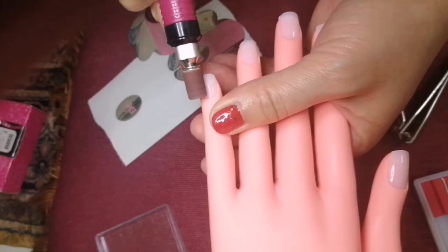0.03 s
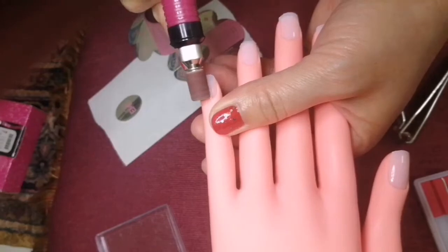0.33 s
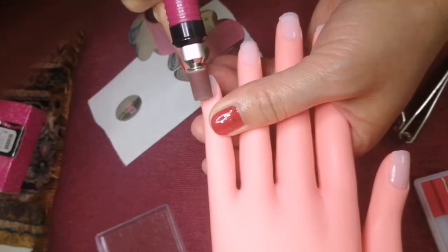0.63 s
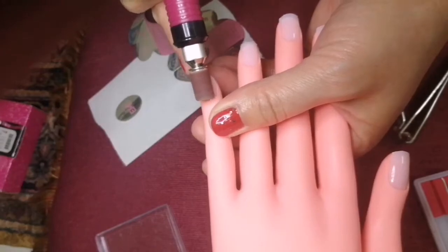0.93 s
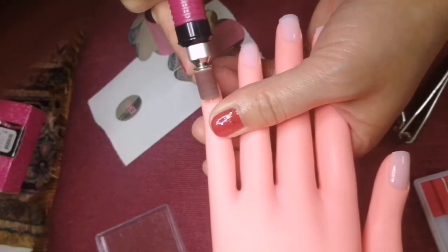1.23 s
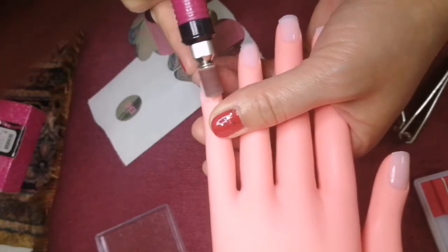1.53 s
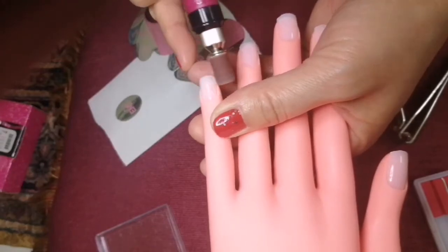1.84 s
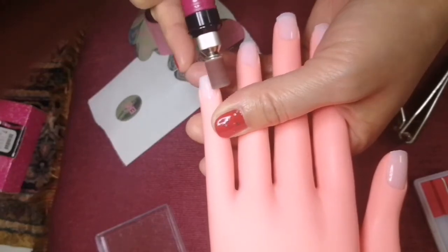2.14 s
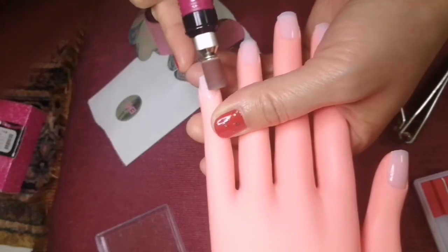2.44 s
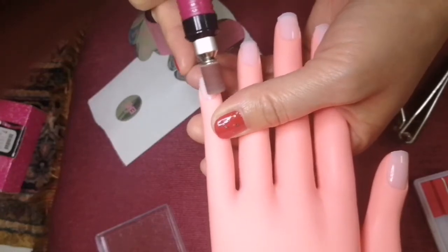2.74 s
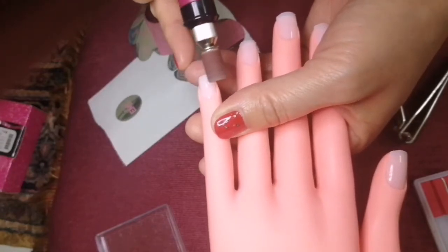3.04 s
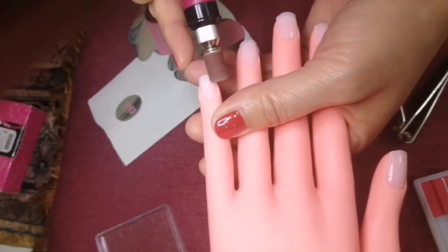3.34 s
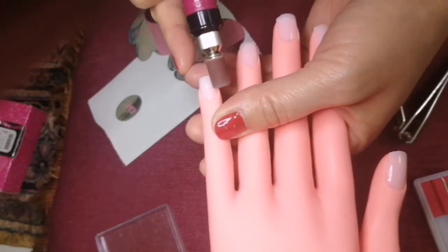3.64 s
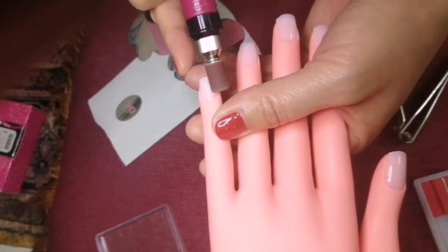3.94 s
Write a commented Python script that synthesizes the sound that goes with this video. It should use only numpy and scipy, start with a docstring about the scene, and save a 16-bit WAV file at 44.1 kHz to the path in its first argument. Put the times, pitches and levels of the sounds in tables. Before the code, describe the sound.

An electric nail drill hums close by in a small room. Its sanding drum rasps against a plastic nail in about nine short strokes, each with a fluttering buzz and thin high ring as the motor slows slightly.

```python
"""Electric nail drill on a plastic nail

A drill hums at about 65 turns a second, close by in a small room. Its sanding drum is pressed on the
nail in nine short strokes and slows under the load. The drum runs slightly out of true, so once a
turn it thumps the nail and bites harder: the grit rasps and the bit sings near 7 kHz."""
import sys
import numpy as np
from scipy import signal
from scipy.fft import rfft, irfft
from scipy.io import wavfile
from scipy.ndimage import map_coordinates

SR = 44100
rng = np.random.default_rng(int(sys.argv[2]) if len(sys.argv) > 2 else 0)


def generate_wav(sig):
    """Save sig (samples, or channels by samples) to the path in sys.argv[1] as 16-bit PCM at SR."""
    pcm = np.round(np.clip(np.atleast_2d(sig).T, -1, 1) * 32767).astype(np.int16)
    wavfile.write(sys.argv[1], SR, pcm)


N = 176400
TIME_S = np.arange(N) / SR
KNOCK_TURN, SHOVE_TURN, BITE_TURN = .04, .08, .15  # places within one turn


def from_db(db):
    """Decibels to amplitude ratio."""
    return 10 ** (np.asarray(db) / 20)


def unit_power(x):
    """Normalisation to a mean square of one."""
    return x / np.sqrt(np.mean(x ** 2) + 1e-20)


def in_time(rows):
    """Linear interpolation of each column over time."""
    time_s, *columns = np.transpose(rows)
    return [np.interp(TIME_S, time_s, column) for column in columns]


def at_hz(points):
    """Interpolation over log frequency."""
    hz, value = np.transpose(points)
    return np.interp(np.log(np.fft.rfftfreq(2 * N, 1 / SR) + 1), np.log(hz), value)


def resonate(x, spectrum):
    """Forced vibration: a body acts as a minimum-phase filter; the output has unit power."""
    cepstrum = irfft(np.log(from_db(at_hz(spectrum))))
    cepstrum[1:N] *= 2
    cepstrum[N + 1:] = 0
    response = np.exp(rfft(cepstrum))
    return unit_power(irfft(rfft(x, 2 * N) * response)[..., :N])


def contact(turns, width, floor, uneven_db):
    """Amplitude modulation: pressure peaks once a turn, unevenly, above a steady floor."""
    phase = turns - BITE_TURN + .5
    strength = from_db(uneven_db * rng.standard_normal(SR))[phase.astype(int) + 1]
    return floor + strength * np.exp(-.5 * ((phase % 1 - .5) / width) ** 2)


def friction(turns, fresh, grain_db):
    """Roughness noise: tiny impacts, partly repeating each turn, partly fresh; two unrelated rows."""
    size = int(N / turns[-1])
    phasors = np.exp(2j * np.pi * rng.random((2, size)))
    rim = unit_power(np.fft.ifft(phasors).real)
    repeated = np.array([map_coordinates(row, [turns % 1 * size], mode="grid-wrap") for row in rim])
    noise = rng.standard_normal((2, N))
    grains = unit_power(noise * from_db(grain_db * np.minimum(rng.exponential(1, N), 5)))
    return np.sqrt(1 - fresh) * repeated + np.sqrt(fresh) * grains


def knocks(turns, at, scatter_rad, jitter_turns):
    """Periodic impacts: one knock a turn is a harmonic series, smeared by phase scatter."""
    half_turns = np.arange(2 * int(turns[-1]) + 4)
    wander = np.interp(2 * turns, half_turns, rng.standard_normal(len(half_turns)))
    phase = turns - at + jitter_turns * wander
    harmonics, grid = np.arange(2, 60), np.linspace(0, 1, 2048)
    offsets = scatter_rad * rng.standard_normal(len(harmonics))
    cycle = np.cos(2 * np.pi * np.outer(grid, harmonics) + offsets).sum(axis=1)
    return unit_power(np.interp(phase % 1, grid, cycle))


def reverberation(x, t60_s=.16, above_hz=1340):
    """Diffuse reflections: a treble tail that decays exponentially."""
    t = np.arange(SR // 2) / SR
    tail = rng.standard_normal((2, len(t))) * np.exp(-np.log(1000) * t / t60_s)
    highpass = signal.butter(2, above_hz, "high", fs=SR, output="sos")
    tail = signal.sosfilt(highpass, unit_power(tail) / np.sqrt(len(t)))
    return signal.fftconvolve(x, tail, axes=1)[:, :N]


# Level difference: frequency_hz, left_minus_right_db
BALANCE = [(300,0.9),(900,1),(1500,-2),(2000,0),(2300,4.8),(2800,-1),(4500,-1),(5200,-6),(5900,-14),(6600,-13),(7350,-9),(7700,1),(8900,3),(9300,15),(10100,20),(11000,11.8),(12000,10.7),(14000,1.7),(16000,0)]
# Phase difference: frequency_hz, left_lead_rad
PHASE_LEAD = [(100,0),(800,0),(1300,1.3),(1900,2.7),(2600,2.4),(3000,3.6),(3700,3.8),(4100,1.6),(4900,.3),(5400,-.9),(7200,-.7),(8000,0),(16000,0)]
# Likeness of the channels: frequency_hz, coherence_ratio
COHERENCE = [(40,0.79),(150,0.33),(800,0.75),(1400,0.53),(2500,0.59),(3200,0.22),(4800,1),(6200,0.24),(7200,0.96),(8400,0.66),(10000,.3),(14000,0.22)]

def microphones(x):
    """Partial coherence: row 0 reaches two ports in phase, row 1 opposed; each has its gain and lag."""
    shared, opposed = rfft(x, 2 * N)
    alike, sides = np.clip(at_hz(COHERENCE), 0, 1), np.array([[1], [-1]])
    pair = np.sqrt((1 + alike) / 2) * shared + sides * np.sqrt((1 - alike) / 2) * opposed
    gain = from_db(sides * at_hz(BALANCE) / 2)
    gain /= np.sqrt(np.mean(gain ** 2, axis=0))
    lead = np.exp(.5j * sides * at_hz(PHASE_LEAD))
    return irfft(gain * lead * pair)[:, :N]


# Room noise spectrum: frequency_hz, gain_db
RUMBLE_SPECTRUM = [(20,-3.5),(30,-8.5),(40,5.5),(50,-7),(80,-9),(120,-9.5),(170,-16.5),(400,-18),(1500,-70),(15000,-35.5)]

def room_rumble(level_db=-67):
    """Ambient noise: steady, with its power mostly in the bass."""
    return from_db(level_db) * resonate(rng.standard_normal((2, N)), RUMBLE_SPECTRUM)


# Low drone: time_s, level_db
DRONE_LEVEL = [(0.1,-88),(0.5,-84),(0.65,-67),(0.82,-69),(1.0,-70.5),(1.6,-66.5),(1.8,-91),(4,-79)]

def drone(turns):
    """Second harmonic: a pure tone at twice the rotation rate, in the shared row."""
    level_db, = in_time(DRONE_LEVEL)
    return from_db(level_db) * np.sqrt(2) * np.sin(2 * np.pi * 2 * turns) * [[1], [0]]


# The motor is heard more or less directly as the hand turns: time_s, hum_db, hiss_db
MOTOR_LEVELS = [(0.07,-93,-74),(0.16,-50.5,-50),(0.65,-56.5,-55),(1.3,-55,-54.5),(1.9,-56,-53.5),(2.42,-59,-55),(3.1,-59,-53),(4,-66.5,-53)]
# Housing and bearing spectra: frequency_hz, gain_db
HOUSING_SPECTRUM = [(250,-35.5),(400,-36.5),(560,-6),(760,-34),(925,0),(1130,-18.5),(1390,-3),(1750,-9.5),(2100,-13.5),(2550,4.5),(2900,-10.5),(3200,-4),(3700,-25.5),(6000,-9.5)]
BEARING_SPECTRUM = [(700,-22),(2500,-5.5),(3700,-15),(4400,-10),(5100,0.5),(5900,2),(7200,-11),(8300,-8.5),(10000,-4.5),(12500,-13),(15000,-12.5)]

def motor(turns):
    """Structure-borne sound: the rotor knocks and rattles its housing once a turn; the bearings hiss."""
    hum_db, hiss_db = in_time(MOTOR_LEVELS)
    rattle = friction(turns, fresh=.3, grain_db=1) * contact(turns, width=.08, floor=.12, uneven_db=1)
    knock = np.array([knocks(turns, KNOCK_TURN, scatter_rad=.45, jitter_turns=.001),
                      knocks(turns, BITE_TURN, scatter_rad=.6, jitter_turns=.001)])
    hum = resonate(knock + 1.05 * unit_power(rattle), HOUSING_SPECTRUM)
    rolling = friction(turns, fresh=.64, grain_db=3) * contact(turns, width=.12, floor=1.37, uneven_db=1)
    return from_db(hum_db) * hum + from_db(hiss_db) * resonate(rolling, BEARING_SPECTRUM)


# Fizz on the nail's right edge: time_s, level_db
FIZZ_ENVELOPE = [(3.42,-82),(3.48,-49),(3.72,-52.5),(3.78,-82),(3.84,-82),(3.88,-59),(4,-61)]
# Its spectrum: frequency_hz, gain_db
FIZZ_SPECTRUM = [(7000,-24),(9000,-8),(10000,7),(12000,-3),(15000,-22)]

def edge_fizz(turns, pressure):
    """Impulsive friction: spiky grains fizz near 10 kHz."""
    level_db, = in_time(FIZZ_ENVELOPE)
    return from_db(level_db) * resonate(friction(turns, fresh=.53, grain_db=10) * pressure, FIZZ_SPECTRUM)


# The drum catches an edge: centre_s, sigma_s, level_db
EDGE_CATCHES = [(0.2,0.036,-42.5),(0.83,0.032,-44.5),(2.27,0.017,-40.5),(2.584,0.084,-51.5)]
# Scrape spectrum: frequency_hz, gain_db
SCRAPE_SPECTRUM = [(2000,-21.5),(4200,-13),(4900,-1),(5300,1),(5800,2),(6800,-23),(12000,-32)]

def edge_scrape(turns, pressure):
    """Transient friction: each catch is a harsh burst with a Gaussian envelope."""
    envelope = sum(from_db(level_db) * np.exp(-.5 * ((TIME_S - centre_s) / sigma_s) ** 2)
                   for centre_s, sigma_s, level_db in EDGE_CATCHES)
    return envelope * resonate(friction(turns, fresh=.91, grain_db=-.5) * pressure, SCRAPE_SPECTRUM)


# Nail resonances at three contact points: frequency_hz, gain_db
LEFT_SPECTRUM = [(170,-22),(245,-12),(305,-8),(370,-21),(520,-13),(620,-13),(760,-3),(900,1),(1120,-11),(1280,-8),(1500,-14),(1850,-17)]
TIP_SPECTRUM = [(170,-32),(245,-16),(305,-15),(360,-25),(520,-21),(620,-13),(750,1),(920,-5),(1120,-19),(1280,-10),(1500,-20),(1850,-22)]
RIGHT_SPECTRUM = [(170,-26),(245,-13),(305,-14),(360,-23),(520,-14),(620,-9),(750,1),(920,-6),(1120,-20),(1280,-14),(1500,-6),(1850,-24)]

def nail_thump(turns, to_tip_s=1.9, to_right_s=3.2):
    """Eccentric forcing: the drum's high side shoves the nail, which rings differently at each place."""
    rub = friction(turns, fresh=.6, grain_db=2) * contact(turns, width=.1, floor=.25, uneven_db=1.5)
    shove = knocks(turns, SHOVE_TURN, scatter_rad=.6, jitter_turns=.003) * [[1], [0]]
    force = .6 * unit_power(rub) + shove
    place = np.searchsorted([to_tip_s, to_right_s], TIME_S)
    return sum(resonate(force, [(60, -45)] + nail + [(2600, -30.5), (8000, -39)]) * (place == k)
               for k, nail in enumerate((LEFT_SPECTRUM, TIP_SPECTRUM, RIGHT_SPECTRUM)))


# Envelopes before the trims, one list a stroke: time_s, ring_db, thump_db, rasp_db
STROKE_LEVELS = [
    [(0.08, -69.5, -77.5, -65.5), (0.182, -57, -57.5, -50.5), (0.256, -51, -59.5, -49),
     (0.412, -46.5, -53, -47.5), (0.504, -44, -50, -48.5), (0.554, -70, -78, -60), (0.58, -91, -81, -59)],
    [(0.7, -72, -87, -59), (0.732, -54, -68, -53), (0.756, -49.5, -66, -49), (0.85, -44, -52.5, -47.5),
     (0.918, -44, -51.5, -49.5), (0.95, -65, -77, -61), (0.98, -77, -79, -61)],
    [(1.06, -74, -80, -62), (1.106, -49.5, -63, -57), (1.166, -45, -58.5, -52), (1.172, -47, -54.5, -52),
     (1.232, -47, -52, -55), (1.258, -52, -63, -55), (1.32, -81, -75, -68)],
    [(1.34, -71, -86, -65), (1.392, -48.5, -64, -55.5), (1.466, -48.5, -49, -49.5),
     (1.54, -49.5, -53.5, -57), (1.642, -46.5, -46, -48.5), (1.674, -62, -62, -70), (1.7, -78, -67.5, -76)],
    [(2.12, -78, -98, -61.5), (2.146, -66, -61, -59), (2.176, -54.5, -53.5, -56.5), (2.222, -50, -48, -49),
     (2.274, -43.5, -42, -46.5), (2.332, -41.5, -44.5, -48.5), (2.4, -79, -77, -75)],
    [(2.47, -76, -77, -67), (2.494, -51, -57, -59), (2.52, -46, -43.5, -47.5), (2.622, -42.5, -42.5, -41),
     (2.724, -47.5, -52, -56), (2.75, -60, -83, -76), (2.77, -73, -68, -75)],
    [(2.78, -77, -82, -62), (2.806, -53.5, -52, -61.5), (2.876, -49, -45.5, -48),
     (2.912, -42, -43.5, -52.5), (2.938, -47.5, -49, -52), (2.952, -50, -63, -59), (2.99, -70, -71, -67)],
    [(3.41, -75, -73.5, -69), (3.472, -48.5, -47, -57.5), (3.616, -50, -48, -55), (3.684, -45.5, -44, -51),
     (3.738, -53.5, -49.5, -57), (3.77, -67, -69, -65), (3.8, -77, -67, -61)],
    [(3.83, -82, -68, -73), (3.842, -72, -84, -57), (3.85, -64, -72, -73), (3.854, -52.5, -56.5, -59),
     (3.886, -51, -46.5, -60), (3.916, -52.5, -53, -58.5), (4.0, -51.5, -45.5, -52.5)],
]
# Grit and bit spectra: frequency_hz, gain_db
GRIT_SPECTRUM = [(300,-25),(1000,-3),(1900,-3.5),(2500,4.5),(3000,-4),(3800,-3.5),(4500,-6),(5200,-0.5),(6000,-1),(7500,-27),(9000,-26),(13000,-17.5),(15500,-44)]
BIT_SPECTRUM = [(1500,-27),(4000,-22),(5500,-19.5),(6600,-6),(6900,-4.5),(7150,5),(7450,-7),(7800,-10),(8900,-16.5),(9400,-17.5),(9850,-4.5),(10600,-16.5),(12000,-20),(13500,-27.5),(15200,-25.5)]

def sanding(turns, ring_trim_db=5, thump_trim_db=-2, rasp_trim_db=3):
    """Abrasion: grit tears at the nail and excites the bit's resonances, hardest at each thump."""
    ring_db, thump_db, rasp_db = in_time([row for stroke in STROKE_LEVELS for row in stroke])
    sharp_bite = contact(turns, width=.065, floor=.5, uneven_db=2)
    broad_bite = contact(turns, width=.13, floor=1.1, uneven_db=3)
    rasp = resonate(friction(turns, fresh=.78, grain_db=3.5) * sharp_bite, GRIT_SPECTRUM)
    ring = resonate(friction(turns, fresh=.9, grain_db=6) * broad_bite, BIT_SPECTRUM)
    return (edge_fizz(turns, broad_bite) + edge_scrape(turns, sharp_bite)
            + from_db(thump_db + thump_trim_db) * nail_thump(turns)
            + from_db(rasp_db + rasp_trim_db) * rasp
            + from_db(ring_db + ring_trim_db) * ring)


# Drill speed, sagging under load: time_s, rotation_hz
DRILL_SPEED = [(0.1, 60.04), (0.3, 61.49), (0.42, 59.13), (0.5, 59.76), (0.56, 65.99), (0.71, 63.1),
               (0.8, 61.49), (0.9, 62.13), (0.96, 64.57), (1.09, 63.29), (1.22, 60.27), (1.29, 65.32),
               (1.37, 63.46), (1.46, 62.65), (1.55, 62.97), (1.64, 62.55), (1.7, 64.6), (2.13, 65.74),
               (2.22, 61.76), (2.32, 57.24), (2.38, 65.34), (2.48, 65.78), (2.56, 55.87), (2.68, 56.37),
               (2.75, 68.38), (2.8, 62.48), (2.93, 60.44), (2.98, 65.23), (3.42, 64.48), (3.5, 62.44),
               (3.71, 61.42), (3.77, 65.55), (3.83, 63.04), (3.9, 62.27), (4.0, 63.7)]

def scene(reverb_db=-8.5):
    """Superposition: motor and sanding share one rotation, over the rumble of the room."""
    rotation_hz, = in_time(DRILL_SPEED)
    turns = np.cumsum(rotation_hz) / SR
    direct = microphones(room_rumble() + drone(turns) + motor(turns) + sanding(turns))
    return direct + from_db(reverb_db) * reverberation(direct)


def record(dry):
    """Band limiting: a steep low-pass follows a quick fade-in."""
    start_s, rise_s, cutoff_hz = .078, .053, 15700
    fade = np.clip((TIME_S - start_s) / rise_s, .01, 1)
    return signal.sosfilt(signal.ellip(12, .1, 80, cutoff_hz, fs=SR, output="sos"), dry * fade)


dry = scene()
out = record(dry)
generate_wav(out)
```